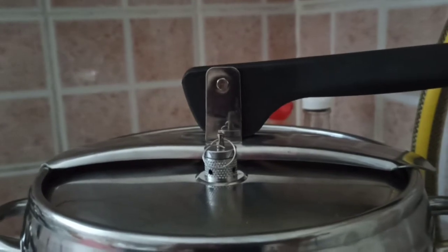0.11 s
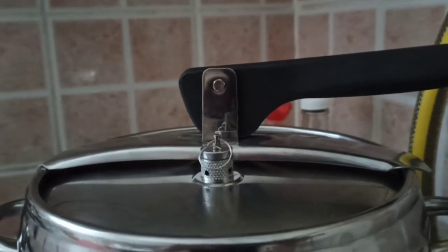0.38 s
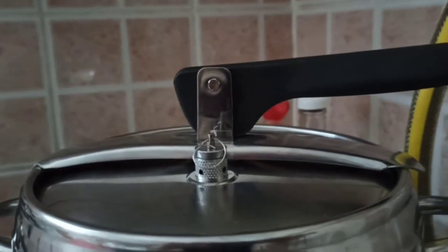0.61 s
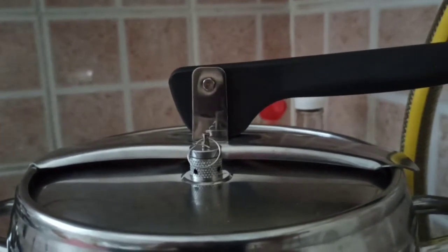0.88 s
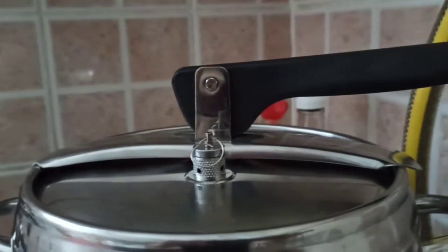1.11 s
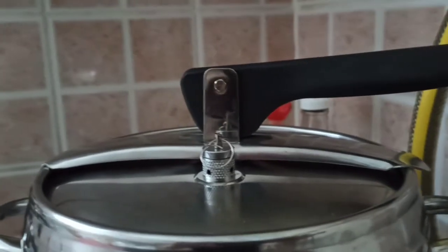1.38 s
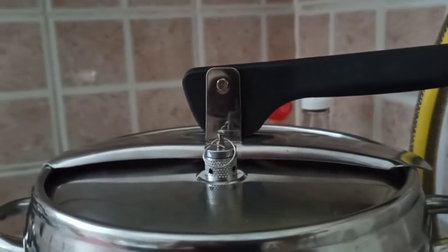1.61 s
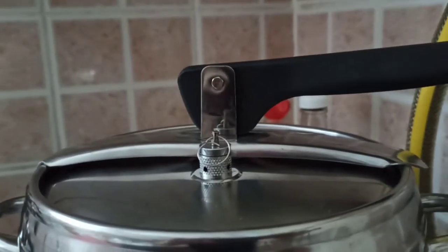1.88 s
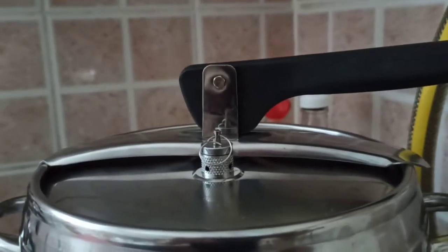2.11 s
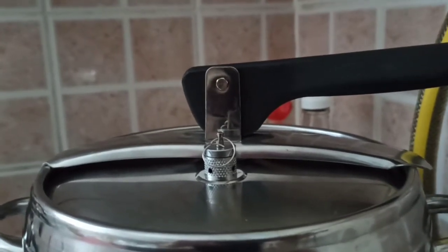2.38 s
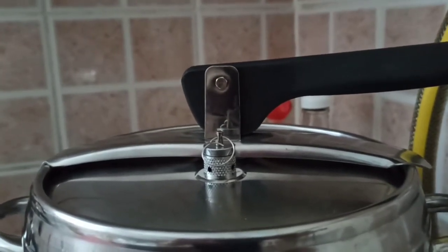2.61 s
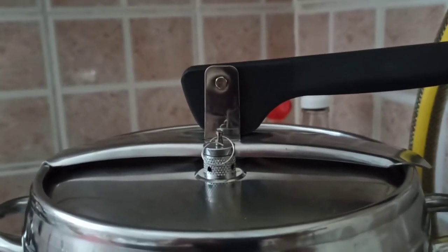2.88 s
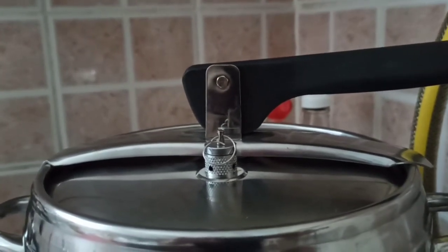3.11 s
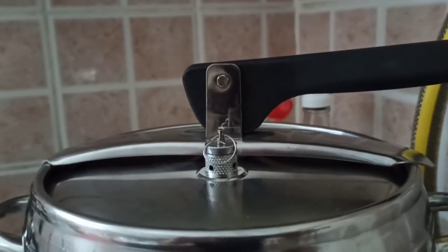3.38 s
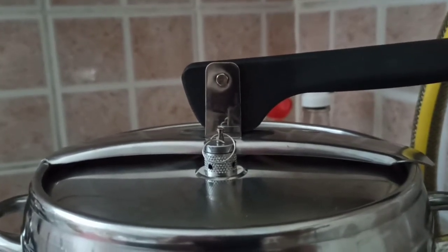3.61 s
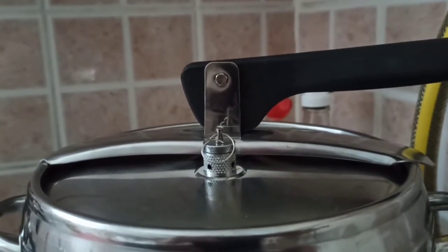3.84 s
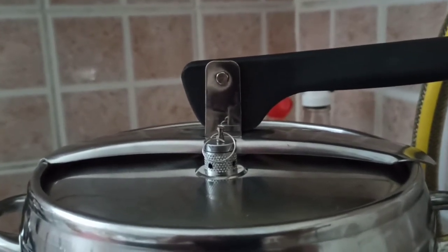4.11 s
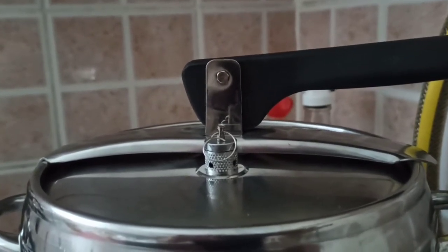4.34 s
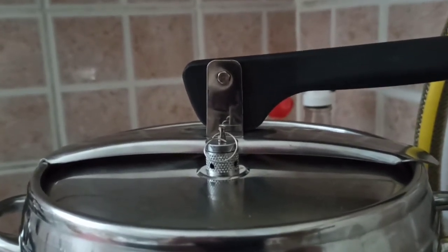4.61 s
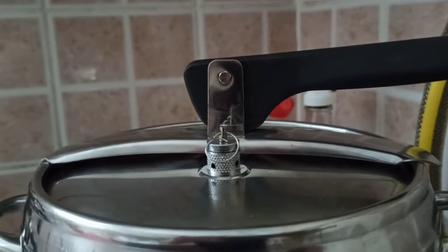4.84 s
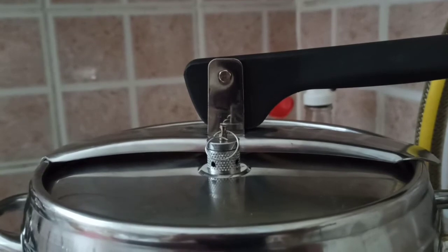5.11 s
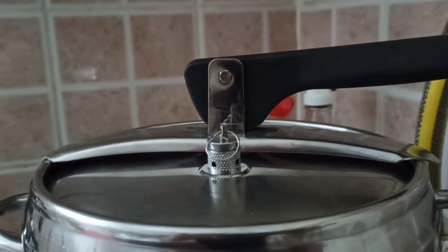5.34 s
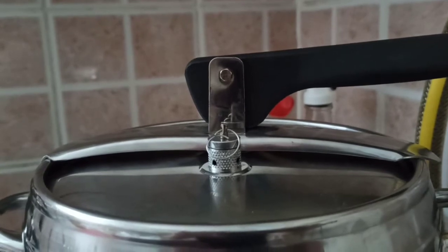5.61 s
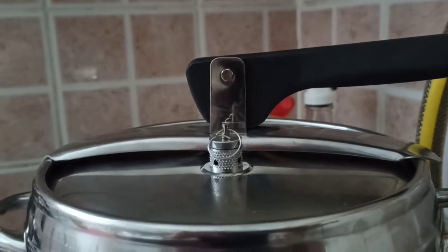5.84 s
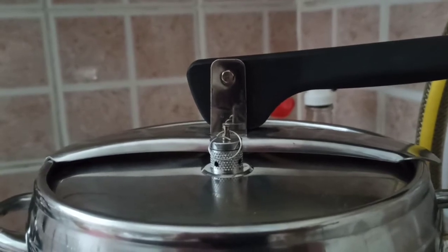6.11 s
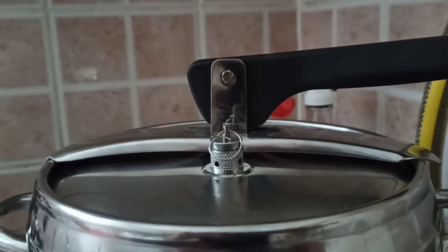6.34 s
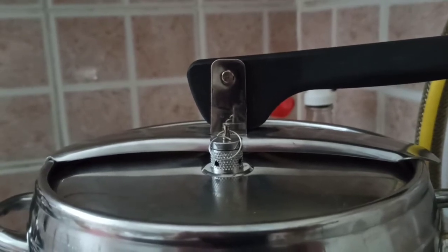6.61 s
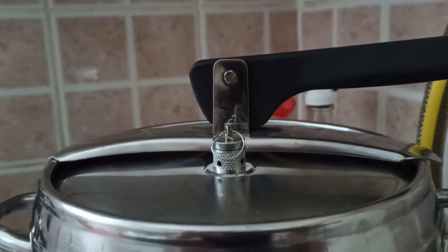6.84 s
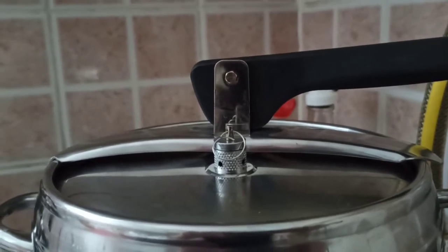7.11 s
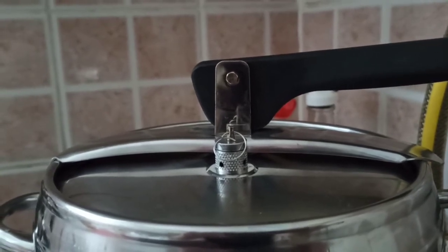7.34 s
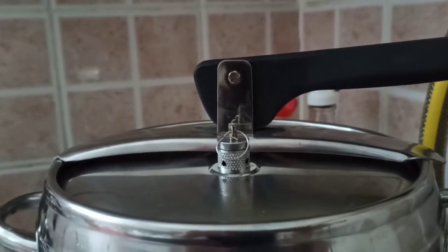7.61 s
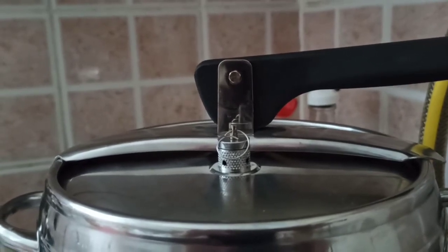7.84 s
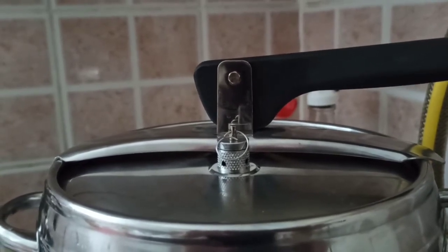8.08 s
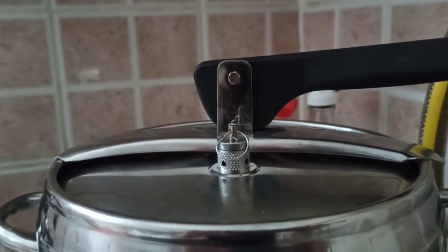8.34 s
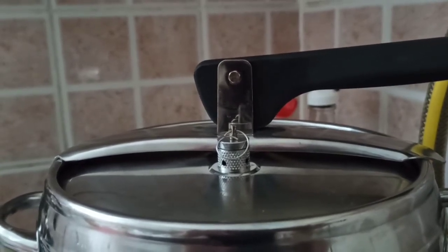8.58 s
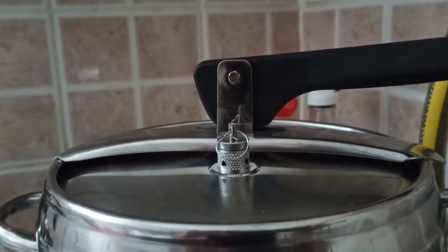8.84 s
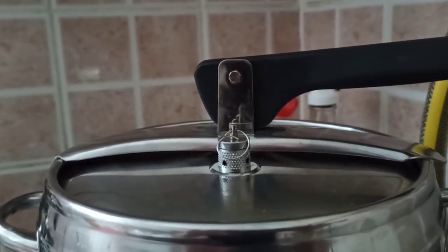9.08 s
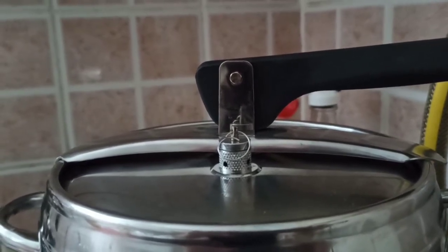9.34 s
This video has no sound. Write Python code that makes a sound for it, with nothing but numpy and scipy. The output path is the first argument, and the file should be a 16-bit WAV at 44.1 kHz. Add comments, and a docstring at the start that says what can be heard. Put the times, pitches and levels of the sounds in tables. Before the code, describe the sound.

From 0 to about 9.5 seconds, a pressure cooker vents steam through its lid valve without a break, already at full pressure at the start and still going at the cut. The jet is a dense, bright, turbulent hiss, weak below one kilohertz, rising strongly above four and loudest around six to eight, with an airy band above about twelve. A fuzzy, noisy whistle sits inside it, never a clean tone. Level is steady, with only tiny quick flutter and momentary swelling patches. Between roughly 0.6 and 7.8 seconds the hand-held microphone drifts slightly, so narrow resonances and comb-like colouring change slowly, then settle. Far beneath, a very faint lumpy boiling rumble near 110 hertz carries weak hum. Near microphone, small tiled kitchen, identical channels, no start or release.

```python
"""A pressure cooker vents a steady jet of steam through its valve in a tiled kitchen, heard by one near microphone.
The turbulent jet hisses widely and whistles fuzzily in the valve cap: shaped noise with a loud treble shelf.
Narrow peaks and notches, below about 9.5 kHz from valve cap and echoes, and a fine echo ripple comb the hiss.
Under it the boiling pot rumbles as low lumpy noise with faint hum lines.
The hand-held microphone drifts from one place to another, so the peaks slowly change."""
import sys
import numpy as np
from scipy import signal
from scipy.io import wavfile
from scipy.ndimage import uniform_filter1d

SR = 44100
rng = np.random.default_rng(int(sys.argv[2]) if len(sys.argv) > 2 else 0)


def generate_wav(signal):
    """Clip the signal to [-1, 1] and save it as 16-bit WAV at the path in sys.argv[1]."""
    frames = np.transpose(np.atleast_2d(signal))
    scaled = np.clip(frames, -1, 1) * 32767
    pcm = np.round(scaled).astype(np.int16)
    wavfile.write(sys.argv[1], SR, pcm)


def decibels_to_gain(level_db):
    """Convert a level in decibels to a linear amplitude gain (20 dB per decade)."""
    exponent = np.asarray(level_db, float) / 20
    return 10 ** exponent


N = 417186  # length in samples
HOP = 512  # samples between noise frames
# the microphone drifts evenly from its first place to its second between these times
DRIFT_START_S, DRIFT_END_S = 0.6, 7.8


def evened(x):
    """Scales to rms 1."""
    return x / np.sqrt(np.mean(x ** 2) + 1e-20)


def over_hz(points, hz):
    """Reads a spectrum in dB at the frequencies hz, on a log-frequency axis."""
    point_hz, level_db = np.transpose(points)
    return np.interp(np.log(hz + 1), np.log(point_hz + 1), level_db)


def over_time(points, t):
    """Reads a curve at the times t."""
    return np.interp(t, *np.transpose(points))


def wander(shape, span, axis):
    """Smooth chance of rms 1: white noise averaged twice over span points along one axis."""
    size = max(round(span), 1)
    once = uniform_filter1d(rng.standard_normal(shape), size, axis)
    return evened(uniform_filter1d(once, size, axis))


def smooth_patches(shape, span_bins, span_frames):
    """Random field of bins x frames with rms 1, smooth in both frequency and time."""
    across_bins = wander(shape[::-1], span_bins, axis=1)
    return evened(uniform_filter1d(across_bins, span_frames, axis=0)).T


def bumps(rows, hz, drift):
    """Bell-shaped peaks and notches in dB that blend from the first microphone place to the second."""
    centre_hz, width_hz, first_db, second_db = np.transpose(rows)
    bells = np.exp(-.5 * ((hz[:, None] - centre_hz) / width_hz) ** 2)
    height_db = first_db[:, None] + (second_db - first_db)[:, None] * drift
    return bells @ height_db


def noise(shape_db):
    """Noise of rms 1 from random short-time spectra under a dB field of bins x frames."""
    size = 2 * (len(shape_db) - 1)
    frames = shape_db.T.shape
    spectra = rng.standard_normal(frames) + 1j * rng.standard_normal(frames)
    sound = signal.istft(spectra.T * decibels_to_gain(shape_db), nperseg=size, noverlap=size - HOP)[1]
    # the thin first frames are skipped
    return evened(sound[size // 2:][:N])


def frame_grid(size):
    """Bin frequencies, and the microphone's way from first place (0) to second (1) at each frame."""
    t = (np.arange((N + size) // HOP + 2) * HOP - size // 2) / SR
    drift = np.clip((t - DRIFT_START_S) / (DRIFT_END_S - DRIFT_START_S), 0, 1)
    return np.fft.rfftfreq(size, 1 / SR), drift


def boiling(lumps_db=0.7):
    """Boiling pot and burner: low noise, lumpy in level, around the pot's drone with faint hum lines."""
    # colour of the rumble, relative: hz, level_db (per Hz)
    rumble_colour = [(15, -20), (35, -20), (60, -15), (90, -5.5), (112, 2.5), (128, -1), (158, -9.5),
                     (250, -9), (338, -12), (372, -19), (500, -18), (800, -21)]
    # faint hum lines over that colour: centre_hz, width_hz, first_place_db, second_place_db
    hum_lines = [(83, 4, 5, 1), (128, 6, -0.5, 1), (172, 7, 3.5, 0), (205, 4, 6, 4.5), (221, 5.6, 4.5, 1),
                 (251.5, 4.3, 4.5, 6), (303, 5.5, 7, 7), (351, 15, 7.5, 7)]
    # slow level of the boiling pot and burner: time_s, level_db
    rumble_level = [(0, -54.5), (2.2, -54.5), (2.9, -53), (3.8, -54), (4.7, -53), (6.2, -54.5), (7.8, -53),
                    (9.46, -54)]
    hz, drift = frame_grid(size=12288)
    colour_db = over_hz(rumble_colour + [(3000, -90)], hz)
    field_db = colour_db[:, None] + bumps(hum_lines, hz, drift)
    level_db = over_time(rumble_level, np.arange(N) / SR) + lumps_db * wander(N, 4000, axis=0)
    return noise(field_db) * decibels_to_gain(level_db)


def steam(level_db=-21.5, fine_db=1.8, patchy_db=.35, flutter_db=.45):
    """Turbulent jet noise at steady pressure, whistling in the valve cap and combed by echoes."""
    # colour of the hiss as heard, relative: a loud whistling shelf, a deep valley,
    # then a bright band above 11.6 kHz: hz, level_db (per Hz)
    hiss_colour = [(400, -28.7), (650, -30.0), (1000, -25.9), (2000, -15.5), (2650, -15.5), (4200, -5.2),
                   (4750, -7.3), (4950, -11.6), (6020, -12.0), (6180, -0.1), (7600, 0.0), (7720, -11.3),
                   (8480, -6.8), (8580, -16.9), (9500, -22.8), (11300, -36.2), (11540, -38.9),
                   (11640, -15.9), (13000, -11.6), (15400, -10.8)]
    # clearest peaks and notches of the hiss as heard: below about 9.5 kHz from the valve cap and from
    # echoes off lid and tiles, above that only an uneven treble:
    # centre_hz, width_hz, first_place_db, second_place_db
    ripples = [(970, 30, -2.5, -1.6), (1055, 30, 2.6, 2.8), (1680, 45, -3.3, -2.9), (1980, 110, 1.5, 2.0),
               (2240, 30, -3.5, -3.0), (2625, 20, -2.6, -4.1), (2970, 110, -0.3, 1.6),
               (3210, 20, -3.1, -2.7), (3295, 30, 3.2, 3.8), (3425, 45, -2.7, -0.5), (3575, 45, 1.7, 2.9),
               (3810, 45, 0.1, 3.2), (3985, 30, -2.7, -3.3), (4090, 30, 2.6, 2.4), (4175, 30, -5.3, -4.2),
               (4370, 14, -1.3, -2.3), (4480, 20, -1.3, -3.2), (4630, 45, 3.0, 2.1), (4910, 70, -4.9, -3.8),
               (5145, 30, 3.4, 2.2), (5255, 14, -3.5, -0.9), (5450, 110, 2.7, 3.0), (5880, 110, -2.8, -2.1),
               (6070, 14, -1.5, -3.9), (6265, 20, -1.4, -3.4), (6350, 20, -4.9, -3.6), (6440, 30, 3.5, 2.7),
               (6590, 30, 7.7, 5.9), (6695, 30, -5.1, -1.9), (6785, 30, 3.9, -1.2), (6870, 20, -1.0, 3.1),
               (7065, 20, 2.0, 1.6), (7170, 30, -2.0, -2.9), (7255, 14, 3.4, 0.6), (7300, 70, -3.9, -3.5),
               (7495, 30, 0.5, 4.0), (7580, 110, 2.5, 0.8), (8040, 60, -2.5, -2.5), (8290, 110, -1.2, 1.2),
               (8485, 20, 2.9, 4.2), (8590, 70, -4.7, -1.4), (9000, 110, 1.8, 3.2), (9900, 150, -4.6, 1.0),
               (10915, 70, -4.0, -2.6), (11135, 70, 1.3, 5.1), (11390, 70, -8.8, 1.1),
               (11750, 150, -1.8, 3.3), (12275, 110, -1.4, -4.2), (12770, 110, 1.7, -4.8),
               (13005, 45, 4.6, 1.1), (13845, 110, 1.2, 3.5), (14105, 70, -4.4, 1.0)]
    hz, drift = frame_grid(size=8192)
    field_db = over_hz(hiss_colour, hz)[:, None] + bumps(ripples, hz, drift)

    # the many late echoes of the kitchen add a fine, slowly changing ripple, deeper in the treble;
    # fine_db is its rms depth at 4 kHz
    treble_weight = np.clip(hz / 4000, .5, 1.15)[:, None]
    field_db += fine_db * treble_weight * smooth_patches(field_db.shape, span_bins=4, span_frames=350)

    # eddies make patches of the hiss swell for a moment
    field_db += patchy_db * smooth_patches(field_db.shape, span_bins=90, span_frames=30)

    # the whole jet flutters a little
    flutter = flutter_db * wander(N, 500, axis=0)
    return noise(field_db) * decibels_to_gain(level_db + flutter)


def scene():
    """Steam without its lows, over the boiling pot: one near microphone feeds both channels."""
    low_cut = signal.butter(2, 330, "high", fs=SR, output="sos")
    hiss = signal.sosfilt(low_cut, steam())
    microphone = hiss + boiling()
    return np.tile(microphone, (2, 1))


def roll_off(x):
    """The treble ends steeply here."""
    return signal.sosfilt(signal.butter(12, 16300, fs=SR, output="sos"), x)


def record(dry):
    """A steep band limit at 15480 Hz closes off the top of the hiss."""
    band_limit = signal.firwin(2047, 15480, window=("kaiser", 12), fs=SR)
    mix = signal.oaconvolve(dry, band_limit[None], "same")
    return roll_off(mix)


dry = scene()
out = record(dry)
generate_wav(out)
```